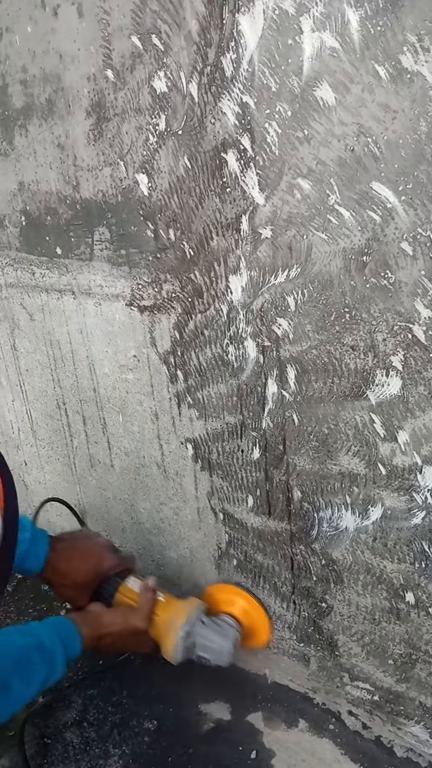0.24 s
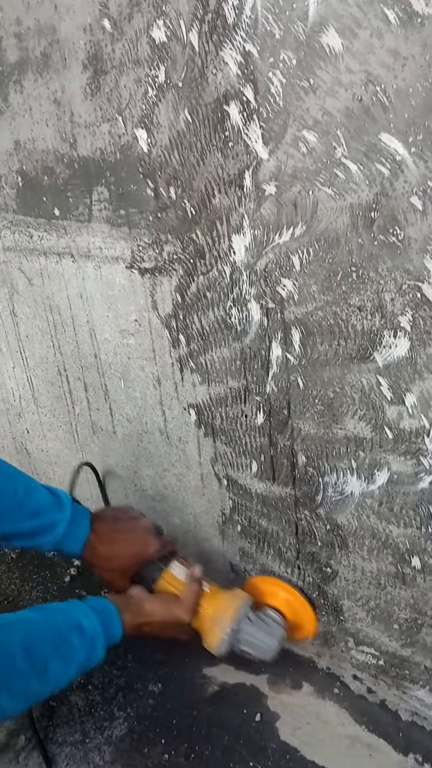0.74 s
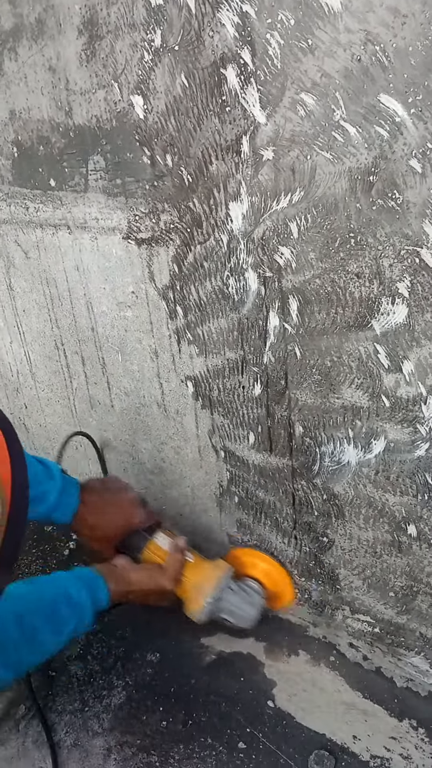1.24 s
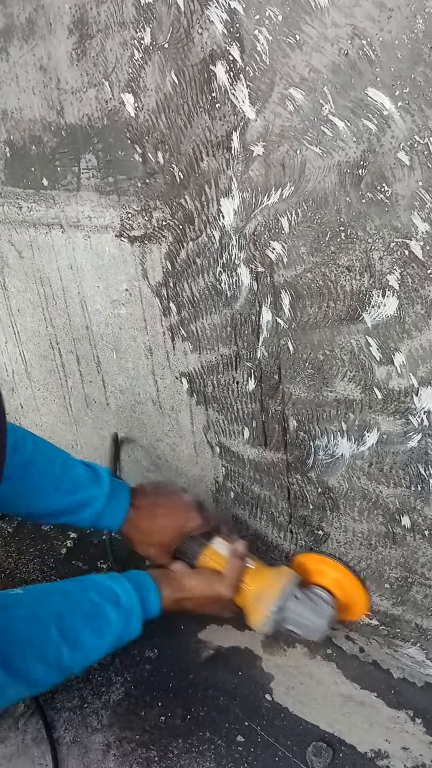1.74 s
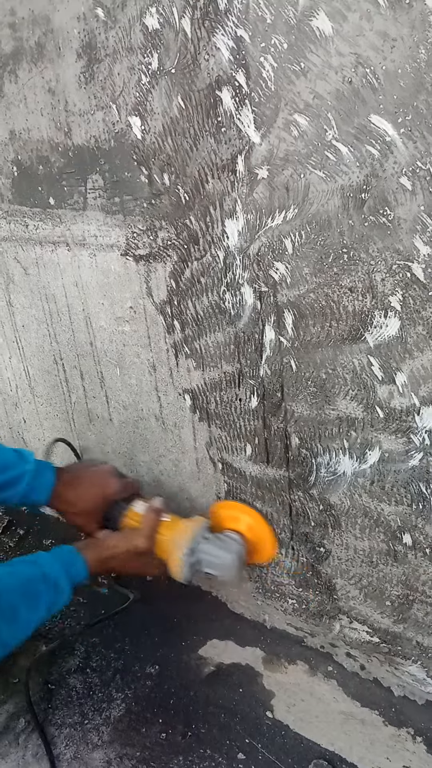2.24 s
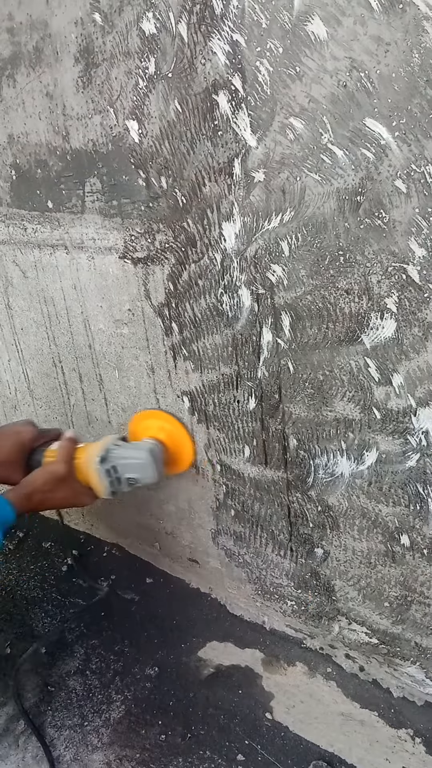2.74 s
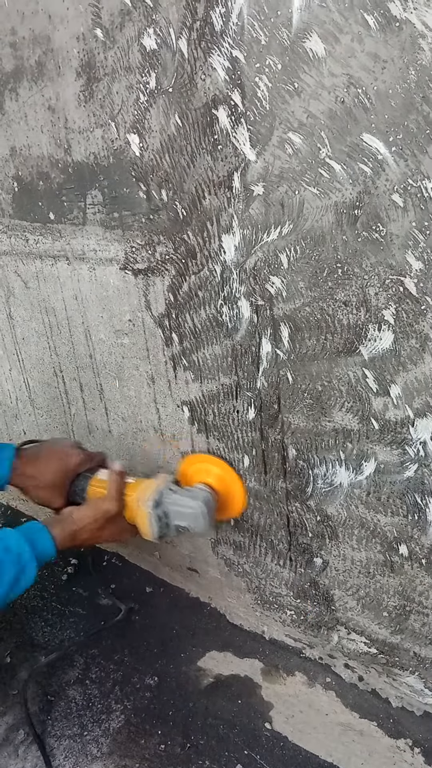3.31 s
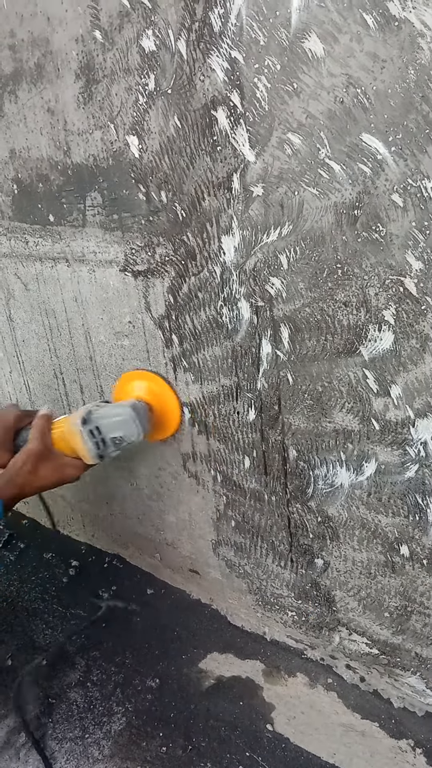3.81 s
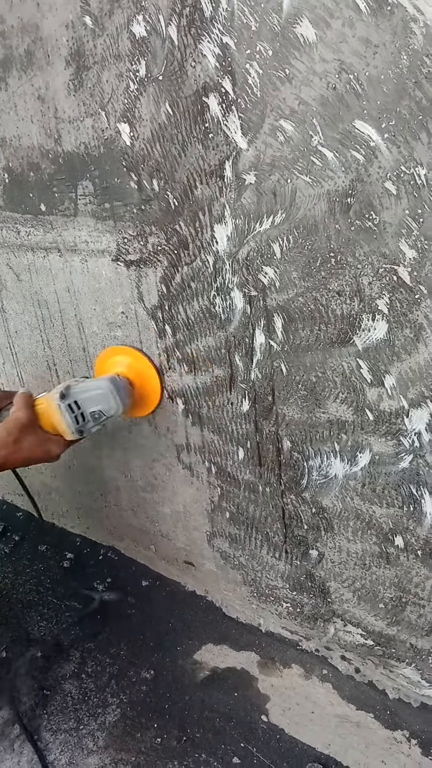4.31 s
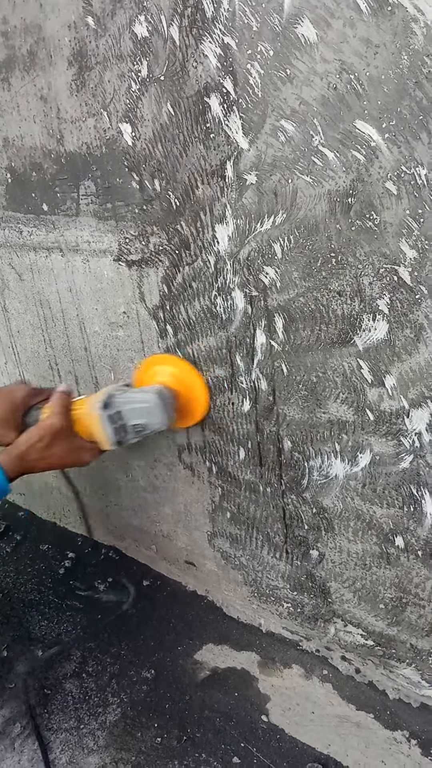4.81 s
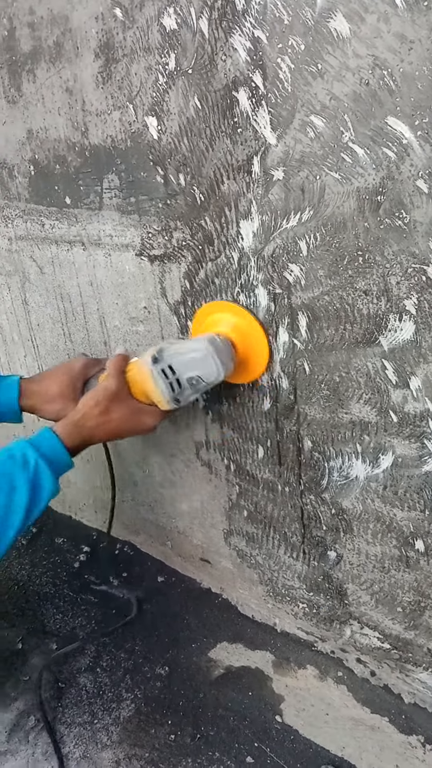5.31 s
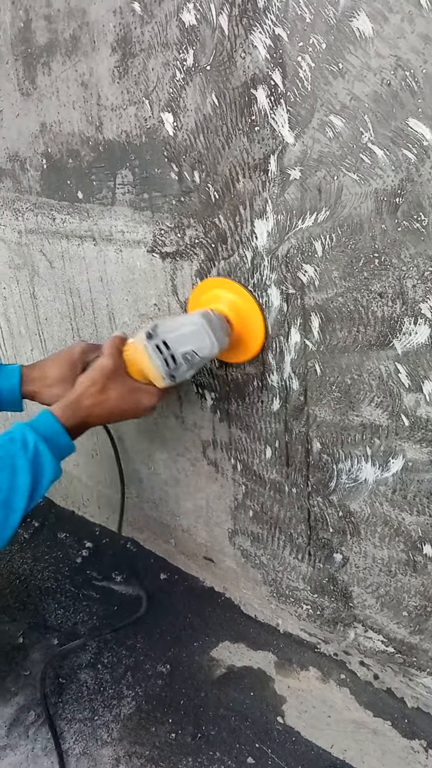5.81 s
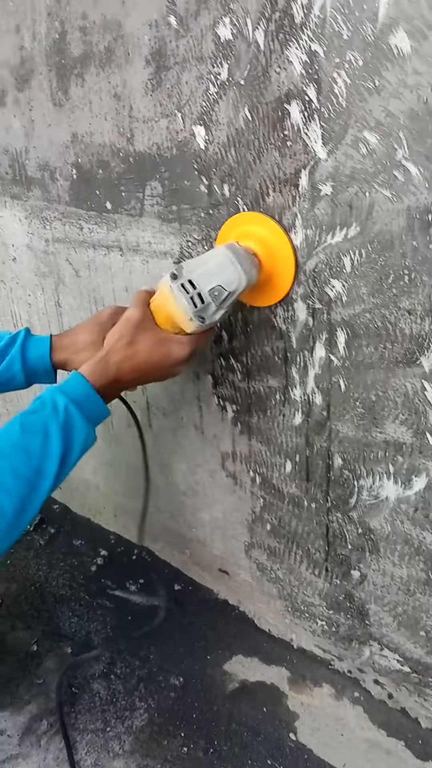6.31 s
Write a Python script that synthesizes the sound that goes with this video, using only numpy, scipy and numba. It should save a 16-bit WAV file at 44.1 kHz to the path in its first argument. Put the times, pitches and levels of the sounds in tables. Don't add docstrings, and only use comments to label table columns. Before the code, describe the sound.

Rough, bright grinding on concrete: stuttering bursts of grit and hiss, shifting metallic ringing, hard knocks and low wall rumble, continuous from start to end.

```python
import sys
import numpy as np
from scipy import signal
from scipy.fft import rfft, irfft
from scipy.io import wavfile
from scipy.ndimage import uniform_filter1d
from numba import njit

SR = 44100
rng = np.random.default_rng(int(sys.argv[2]) if len(sys.argv) > 2 else 0)


def linear_from_db(decibels):
    return 10 ** (np.asarray(decibels, float) / 20)


def wrap_up_sound(samples):
    columns = np.atleast_2d(samples).T
    tamed = np.clip(columns, -1, 1)
    steps = np.round(tamed * 32767).astype(np.int16)
    wavfile.write(sys.argv[1], SR, steps)


N = 288855


# [t/s, pressure/dB, hollowness/dB]
LEAN = [(0, -0.5, 3), (.45, -3, -2), (.9, -2, -0.5), (1.7, -3, 2.5), (2.05, 1, -5), (2.48, -1, -5),
        (2.71, 0, -0.5), (3.0, 0.5, 0.5), (3.4, -0.4, -5), (3.6, 1, -7), (3.8, 2, 3.5), (4.07, 0, 0.5),
        (4.5, 2, 3), (4.74, 1, 4), (5.0, 1.5, 1), (6.1, 1, 2.5), (6.32, 1, -1), (6.55, 0.5, 3)]


def grinding():
    press_db, hollowness_db = curves(LEAN)
    force, soft, blows = contact(press_db)
    spikes_db = 2.0 * np.minimum(rng.exponential(1, (3, N)), 3)
    grains = rng.standard_normal((3, N)) * linear_from_db(spikes_db)
    out = grit(grains[0], force, soft, press_db)
    out = out + guard(grains[1], force, blows, press_db)
    out = out + hollow_wall(grains[1], soft, hollowness_db)
    out = out + dust(grains[2], force + soft)
    drive = force ** 0.41
    free = cup_freed()
    out = out + cup(drive, press_db, free)
    out = out + pressed_cup(drive, press_db)
    return out + cup_overtones(drive, free)


# [first landing t/s, last landing t/s, rate/Hz, peak level/dB]
CHATTER_RUNS = [(.181, .211, 67, -17), (.2335, 0.3146, 36, -15), (0.363, 0.447, 38, -16),
                (.5506, 0.59, 71, -18), (0.628, 0.686, 51, -15), (.9617, .9996, 53, -17),
                (1.0276, 1.1245, 41, -15), (1.1556, 1.266, 36, -16), (1.289, 1.3455, 34, -13),
                (1.397, 1.449, 59, -19), (1.486, 1.536, 58, -18), (1.645, 1.675, 57, -19),
                (1.738, 1.9, 31, -16.5), (2.0647, 2.185, 24, -27), (2.409, 2.47, 33, -21),
                (2.547, 2.636, 33, -16), (2.804, 2.873, 45, -11), (3.096, 3.261, 30.5, -18),
                (3.451, 3.5274, 39, -29), (3.7277, 3.769, 45, -24), (4.255, 4.3673, 36, -10),
                (5.132, 5.159, 64, -27), (5.276, 5.3, 39, -12), (5.332, 5.396, 31, -8.5),
                (5.701, 5.779, 38, -18), (5.842, 6.002, 37, -15), (6.198, 6.278, 38.5, -10.5),
                (6.314, 6.352, 53, -11.5), (6.447, 6.521, 26.5, -17)]
# [t/s, peak level/dB]
KNOCKS = [(0.0267, -12), (.0864, -13), (.5057, -19), (0.7563, -18), (2.5107, -19), (2.729, -12),
          (2.9447, -15), (2.976, -18), (3.3144, -17), (3.3755, -14), (3.563, -13), (5.225, -13),
          (3.9104, -15.5), (3.9446, -18), (3.998, -9.5), (4.023, -18), (4.082, -13.5), (4.141, -15),
          (4.2228, -18), (4.406, -10), (4.4438, -14), (4.4657, -20), (4.6124, -11), (4.7456, -23),
          (4.8723, -8.5), (4.9693, -13), (5.0446, -12), (5.487, -14), (5.577, -16), (6.055, -12)]


def landings():
    runs = []
    for first, last, rate_hz, db in CHATTER_RUNS:
        count = round((last - first) * rate_hz) + 1
        runs += [(s, db) for s in np.linspace(first, last, count)]
    s, peak_db = np.transpose(runs + KNOCKS)
    scatter_db, stray_hz, stray_db = 1.1, 16, -22
    chance = rng.random((200, 2))
    stray_s = np.cumsum(0.3 + 1.4 * chance[:, 0]) / stray_hz
    s = np.append(s, stray_s)
    peak_db = peak_db + scatter_db * rng.standard_normal(len(peak_db))
    peak_db = np.append(peak_db, stray_db + 6 * (chance[:, 1] - 0.5))
    inside = s * SR < N
    return s[inside], peak_db[inside]


def contact(press_db):
    s, peak_db = landings()
    hard = linear_from_db(peak_db - press_db[(s * SR).astype(int)] + 21.5)
    lift_from_db, lift_per_db = -17.5, 0.5
    lifts = [(a - 0.02, b - a + 0.028, max(db - lift_from_db, 0)) for a, b, _, db in CHATTER_RUNS]
    hop = linear_from_db(-lift_per_db * spans(lifts, edge_s=0.023))
    skip_hz = 68.5
    chance = rng.random((600, 2))
    skip_s = np.cumsum(0.75 + 0.5 * chance[:, 0]) / skip_hz
    light = hop * bursts(skip_s, 0.81 + 0.5 * chance[:, 1], decay_s=0.0022)
    flight = bursts(N / SR - s, np.minimum(hard, 1), decay_s=0.0089)[::-1]
    rub = hop * linear_from_db(1.62 * walk(25) - 6.7 * np.minimum(flight, 1))
    blows = light + bursts(s, hard, decay_s=0.0026)
    return rub + blows, np.sqrt(rub) + 0.44 * blows, 0.57 * rub + blows


# [f/Hz, level per Hz/dB]
GRIT_SPECTRUM = [(250, -32), (400, -14.5), (900, -9), (1300, -5.5), (1650, -8.5), (2000, -1.5), (2600, 0.5),
                 (3600, -1), (4400, 0), (5200, 1.5), (5800, -8.5), (7000, -14), (9000, -43)]


def grit(grains, force, soft, press_db):
    low = 1 / (1 + (np.fft.rfftfreq(N, 1 / SR) / 1700) ** 6)
    thrum = irfft(rfft(colour(grains * soft, GRIT_SPECTRUM)) * low, N)
    bright = irfft(rfft(colour(grains * force, GRIT_SPECTRUM)) * (1 - low), N)
    return level(thrum, -39.5) * linear_from_db(0.56 * press_db) + level(bright, -32) * linear_from_db(press_db)


# [f/Hz, width/Hz, level/dB]
GUARD_MODES = [(3380, 260, -1), (3620, 260, 0), (3850, 220, -2.5)]


def guard(grains, force, blows, press_db):
    hits = (blows - 0.33 * force).clip(1e-6) ** 0.8
    ping = level(resonate(grains * hits, GUARD_MODES, wander=0.008), -35)
    turn_db = 1.0 * walk(3.85) + spans([(2.35, 9, -4)], edge_s=0.33)
    return ping * linear_from_db(0.6 * press_db + turn_db)


# [f/Hz, width/Hz, level/dB]
HOLLOW_MODES = [(714, 54, -2), (853, 115, 1.5), (221, 9.7, -13), (151, 15, -12.5), (271.2, 16, -11.5)]


def hollow_wall(grains, soft, hollowness_db):
    return level(resonate(grains * soft, HOLLOW_MODES, wander=0.014), -48) * linear_from_db(2.05 * hollowness_db)


# [f/Hz, level per Hz/dB]
DUST_SPECTRUM = [(4500, -31), (5600, 1.5), (6800, -0.5), (8000, -2), (8800, 5.5), (9600, -4), (10500, -8.5),
                 (11500, -13), (12700, -13), (13600, -18), (14300, -8), (14700, -4), (15700, -2.5),
                 (16500, -10)]


def dust(grains, force):
    return level(colour(grains * force, DUST_SPECTRUM), -31.5) * linear_from_db(0.97 * walk(5))


# [start t/s, length/s, level/dB]
DOME_FREE = [(0.346, 0.064, -31), (0.484, 0.035, -28.5), (1.284, 0.046, -37), (1.42, 0.032, -28),
             (2.118, 0.23, -34), (2.617, 0.14, -33), (2.81, 0.074, -32.5), (3.223, 0.22, -33),
             (3.823, 0.08, -34.5), (3.938, 0.055, -31.5), (4.078, 0.046, -40), (4.295, 0.037, -31),
             (4.408, 0.062, -34), (4.62, 0.044, -32), (4.88, 0.12, -34.5), (5.078, 0.038, -32),
             (5.255, 0.38, -36.5), (5.68, 0.17, -34), (6.096, 0.058, -31.5)]
RIM_FREE = [(0.311, 0.17, -31.5), (0.82, 0.039, -27), (1.205, 0.05, -42), (1.347, 0.03, -36),
            (1.411, 0.036, -31), (1.818, 0.036, -40), (1.956, 0.172, -33.5), (2.153, 0.05, -40),
            (2.273, 0.152, -34), (2.526, 0.26, -29), (2.802, 0.22, -30.5), (3.071, 0.34, -30),
            (3.542, 0.3, -35), (3.869, 0.098, -35), (4.364, 0.034, -40), (4.45, 0.098, -34),
            (4.639, 0.04, -32), (5.017, 0.168, -33), (5.23, 0.054, -34), (5.492, 0.082, -30),
            (5.761, 0.089, -34), (6.076, 0.102, -38), (6.234, 0.1, -32), (6.441, 0.1, -32.5)]
SKIRT_FREE = [(0.155, 0.12, -38.5), (0.56, 0.118, -38), (1.266, 0.053, -37), (1.352, 0.06, -34.5),
              (1.5, 0.082, -38), (1.913, 0.042, -38), (3.82, 0.076, -33), (4.072, 0.03, -41),
              (4.219, 0.11, -36), (4.565, 0.068, -45), (5.109, 0.056, -37), (5.361, 0.055, -36),
              (5.544, 0.51, -39), (6.113, 0.13, -33.5), (6.357, 0.12, -41)]
SEGMENTS_FREE = [(0.38, 0.083, -26), (0.6, 0.174, -27.5), (0.827, 0.18, -29), (1.085, 0.16, -26.5),
                 (1.607, 0.126, -26), (2.541, 0.036, -28), (2.932, 0.06, -30), (3.056, 0.084, -27),
                 (3.186, 0.078, -30), (3.429, 0.23, -28.5), (3.928, 0.058, -33), (5.343, 0.031, -22),
                 (5.796, 0.058, -27), (6.42, 0.11, -25)]


def cup_freed():
    parts = DOME_FREE, RIM_FREE, SKIRT_FREE, SEGMENTS_FREE
    return [spans([(s, length, linear_from_db(db)) for s, length, db in rows], edge_s=0.055) for rows in parts]


# [f/Hz, width/Hz, level/dB]
DOME = [(1995, 50, 0), (2340, 60, 1)]
RIM = [(5313, 32, 0), (5400, 60, -12)]
SKIRT = [(6455, 28, 0), (6102, 32, -9)]
SEGMENTS = [(8470, 50, 0), (8728, 55, -1), (9052, 40, -1.5), (9192, 50, 1.5)]
HELD_DB = (-42.5, -39.5, -40, -33)


def cup(drive, press_db, free):
    follow_press = [0, 0, 0, -0.19]
    held = linear_from_db(np.array(HELD_DB)[:, None] + np.outer(follow_press, press_db))
    parts = DOME, RIM, SKIRT, SEGMENTS
    out = 0
    for rest, swell, modes, trim_db in zip(held, free, parts, (-1.5, 0.0, 4.5, -3.0)):
        tone = level(ring(drive, modes, choke_db=2.8), 0)
        out = out + np.hypot(rest, linear_from_db(trim_db) * swell) * tone
    return out


# [f/Hz, width/Hz, level/dB]
PRESSED_MODES = [(2500, 80, 0), (3000, 60, -4), (4783, 45, -1), (5200, 70, 1), (5050, 90, -3)]


def pressed_cup(drive, press_db):
    return level(ring(drive, PRESSED_MODES), -42.5) * linear_from_db(4.3 * press_db)


# [f/Hz, width/Hz, level/dB]
OVERTONES = [(11322, 28, -55), (11685, 32, -57), (11882, 38, -55), (12258, 30, -58), (13010, 60, -55),
             (13940, 50, -52), (15422, 65, -48.5), (15600, 70, -57), (13330, 70, -65), (14600, 80, -63)]


def cup_overtones(drive, free):
    _, rim, skirt, _ = free
    swell = linear_from_db(0.4 + 2.8 * walk(3.52)) * (1 + 15 * rim + 15 * skirt)
    return swell * ring(drive, OVERTONES, choke_db=5.0)


def ring(drive, modes, choke_db=4.5):
    out = 0
    for hz, width_hz, db in modes:
        grip = walk(35, slew=0.12)
        noise = drive * rng.standard_normal(N)
        centre_hz = hz * (1 + 0.0023 * walk(12) + 0.0013 * walk(2.475))
        tone = svf(noise, centre_hz, width_hz * linear_from_db(-1.5 * grip))
        out = out + level(tone * linear_from_db(choke_db * grip), db)
    return out


def resonate(x, modes, wander):
    out = 0
    for hz, width_hz, db in modes:
        centre_hz = hz * (1 + wander * walk(50, slew=0.16))
        wide_hz = np.full(N, 0.96 * width_hz)
        once = svf(x, centre_hz, wide_hz)
        out = out + level(svf(once, centre_hz, wide_hz), db)
    return out


# [t/s, armature f/Hz]
MOTOR_SPEED = [(0, 345), (.2, 331), (.47, 344), (.7, 332), (.9, 350), (1.7, 328), (2.13, 356), (2.75, 353),
               (3.03, 335), (3.3, 357), (3.85, 372), (4.42, 343), (4.76, 325), (4.96, 353), (5.3, 333),
               (5.55, 351), (5.82, 328), (6.15, 351)]


def motor():
    hz = uniform_filter1d(curves(MOTOR_SPEED)[0], size=3000)
    turn = 2 * np.pi * np.cumsum(hz * (1 + 0.0044 * walk(40))) / SR
    hum_db = -59 + 0.14 * (hz - 342) + 4.4 * walk(9)
    hum = linear_from_db(hum_db) * (1.5 * np.sin(turn) + 0.31 * np.sin(2 * turn))
    gear_ratio = 3.17
    spindle = linear_from_db(-58 + 4 * walk(7)) * np.sin(turn / gear_ratio)
    return hum + spindle + fan(hz)


# [start t/s, length/s, level/dB]
VENTS = [
    (0, 0.63, -52),
    (.84, .14, -54),
    (1.95, .25, -58),
    (2.7, .15, -54),
    (3.03, .3, -55),
    (3.45, .48, -44),
    (4.423, 0.57, -43),
    (5.25, .35, -59),
    (5.8, .3, -49),
]


def fan(armature_hz):
    fan_order = 31
    blades = np.sin(2 * np.pi * np.cumsum(fan_order * armature_hz + 55 * walk(140)) / SR)
    vents = spans([(s, length, linear_from_db(db)) for s, length, db in VENTS], edge_s=0.1)
    return vents * linear_from_db(3 * walk(18) + 0.5) * blades


# [f/Hz, level per Hz/dB]
RUMBLE_SPECTRUM = [(15, -55), (25, -32.5), (102, 2), (174, -1), (267, -1.5), (384, -9), (448, -4.5),
                   (584, -9), (700, -9.5), (910, -25), (1540, -120)]


def wall_rumble():
    white = rfft(rng.standard_normal(N))
    hz, db = np.transpose(RUMBLE_SPECTRUM)
    shape_db = np.interp(np.log(np.fft.rfftfreq(N, 1 / SR) + 1), np.log(hz), db)
    return level(irfft(white * linear_from_db(shape_db), N) * linear_from_db(1.1 * walk(5)), -44.7)


def level(x, db):
    return x * linear_from_db(db) / np.sqrt(np.mean(x ** 2))


def curves(table):
    s, *columns = np.transpose(table)
    return [np.interp(np.arange(N) / SR, s, c) for c in columns]


def colour(x, spectrum):
    hz, db = np.transpose(spectrum)
    gain = linear_from_db(np.interp(np.log(np.arange(1, 1026) * SR / 2048), np.log(hz), db))
    response = np.roll(irfft(gain), 1024) * np.hanning(2048)
    return signal.fftconvolve(x, response, "same")


def walk(rate_hz, slew=1.0):
    k = int(SR / rate_hz)
    held = np.repeat(rng.standard_normal(N // k + 1), k)
    held = np.roll(held, rng.integers(k))[:N]
    return uniform_filter1d(held, max(int(k * slew), 1))


@njit
def svf(x, hz, width_hz):
    y, band, low = np.empty(len(x)), 0., 0.
    for i in range(len(x)):
        g = np.tan(np.pi * hz[i] / SR)
        k = width_hz[i] / hz[i]
        v = (band + g * (x[i] - low)) / (1 + g * (g + k))
        band = 2 * v - band
        low = low + 2 * g * v
        y[i] = k * v
    return y


def bursts(s, size, decay_s):
    kick = np.zeros(N)
    inside = s * SR < N
    np.add.at(kick, (s[inside] * SR).astype(int), size[inside])
    decay = signal.lfilter([1], [1, -np.exp(-1 / (decay_s * SR))], kick)
    return uniform_filter1d(decay, size=90)


def spans(rows, edge_s):
    steps = np.zeros(N + 1)
    for start, length, height in rows:
        steps[min(int(start * SR), N)] += height
        steps[min(int((start + length) * SR), N)] -= height
    return uniform_filter1d(np.cumsum(steps)[:N], max(int(edge_s * SR), 1))


def scene():
    return (grinding() + motor() + wall_rumble())[None]


def band_limit(x):
    return signal.sosfilt(signal.butter(12, 17100, fs=SR, output="sos"), x)


def record(dry):
    top_hz = 15715
    cut = signal.sosfilt(signal.ellip(12, 0.2, 75, top_hz, fs=SR, output="sos"), dry)
    return band_limit(cut)


dry = scene()
out = record(dry)
wrap_up_sound(out)
```